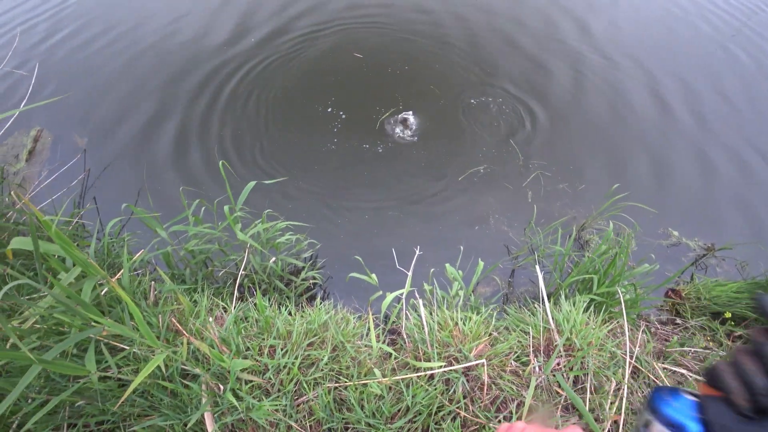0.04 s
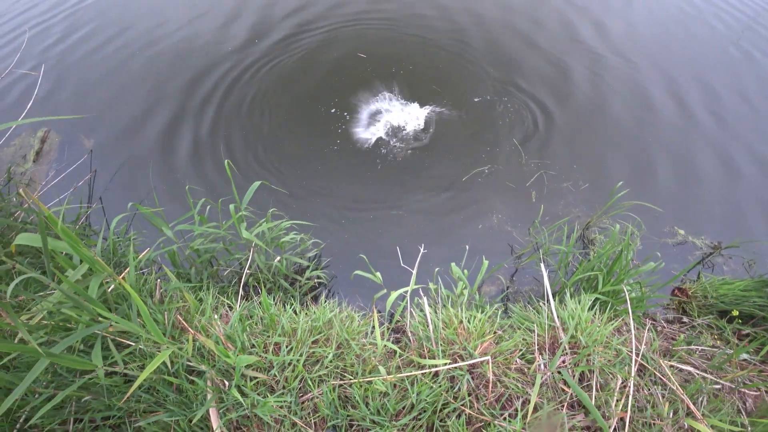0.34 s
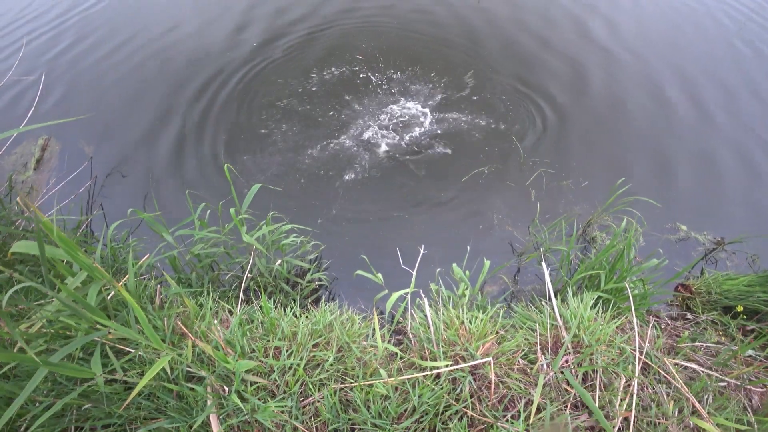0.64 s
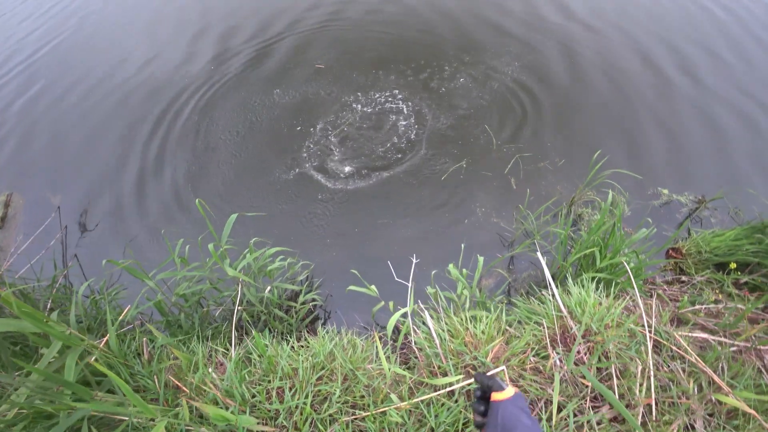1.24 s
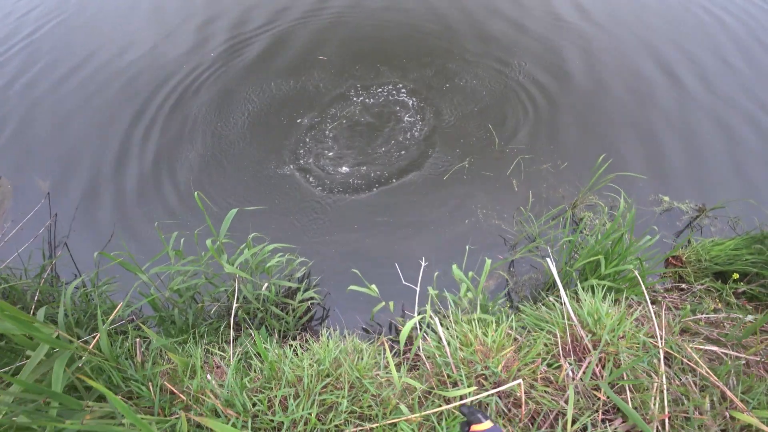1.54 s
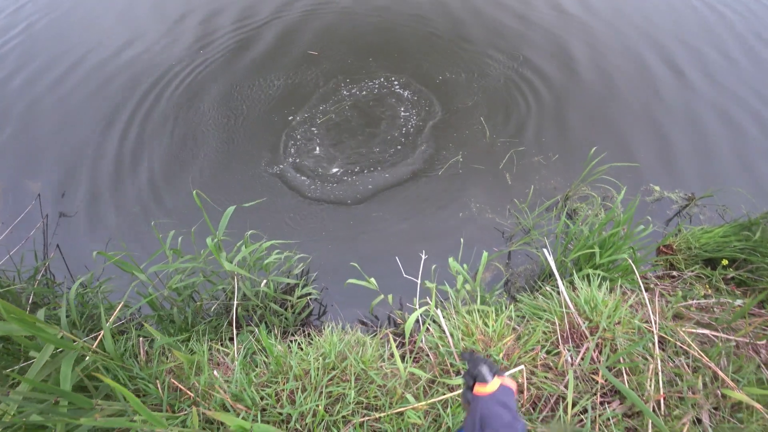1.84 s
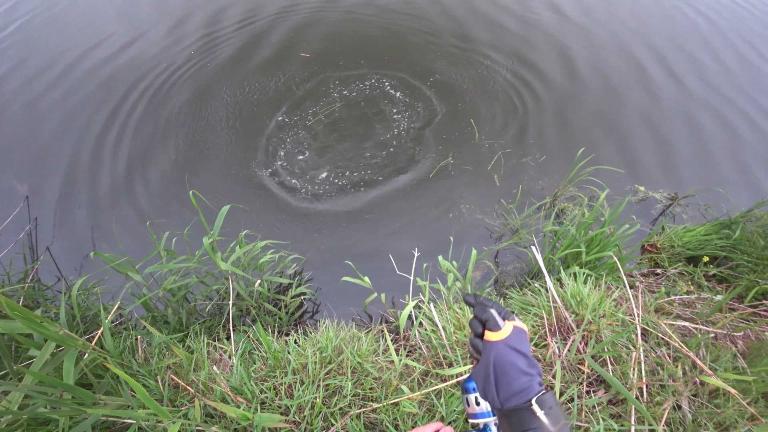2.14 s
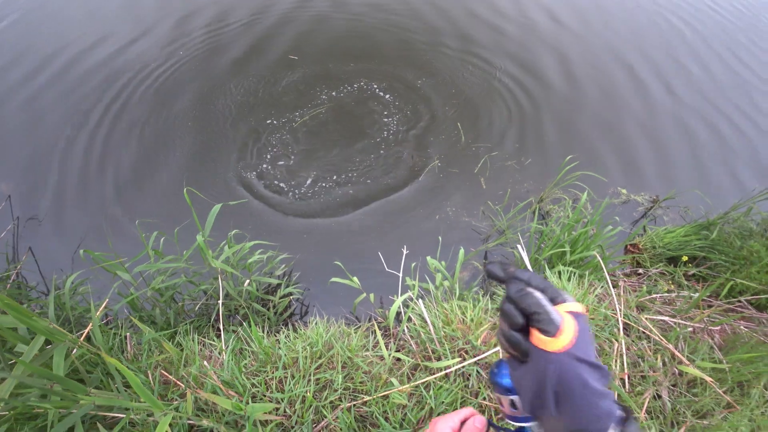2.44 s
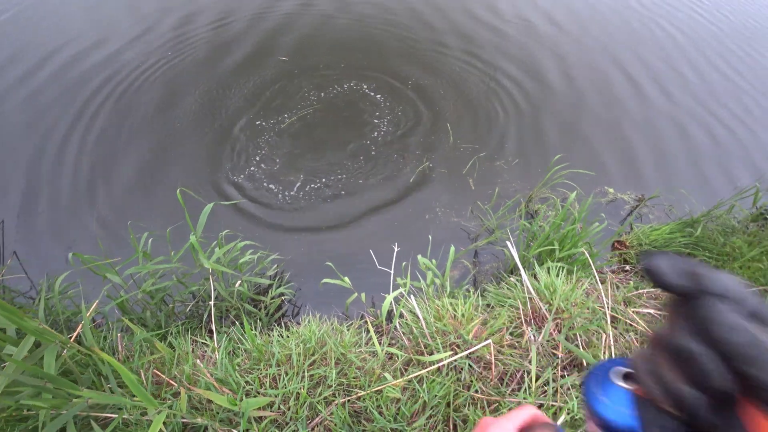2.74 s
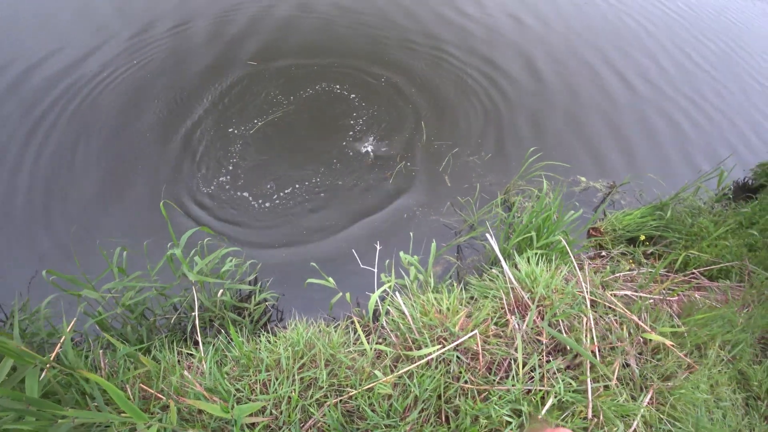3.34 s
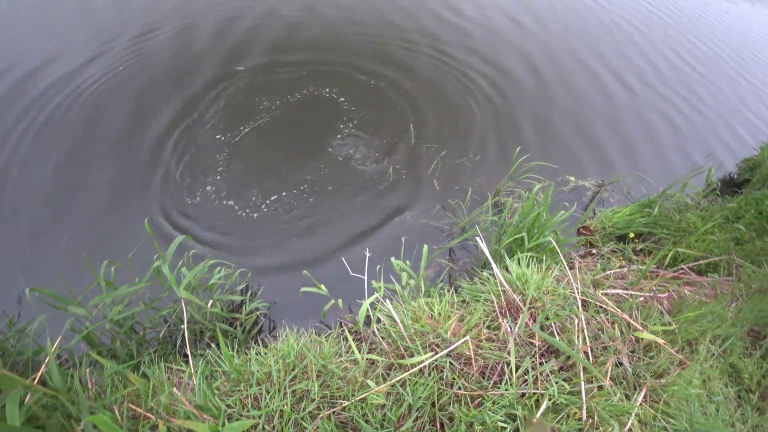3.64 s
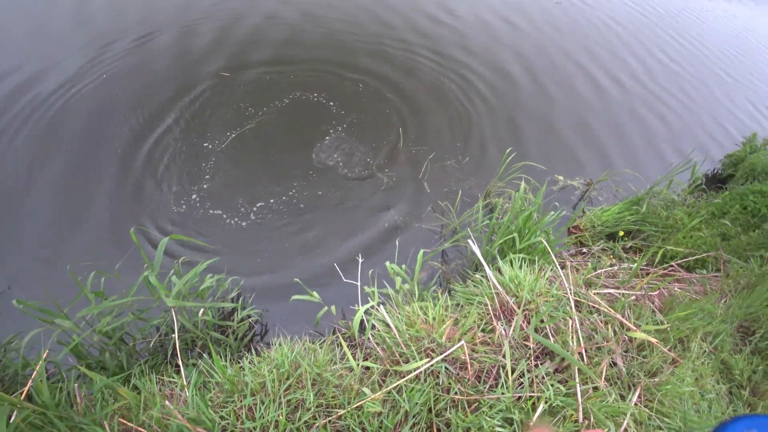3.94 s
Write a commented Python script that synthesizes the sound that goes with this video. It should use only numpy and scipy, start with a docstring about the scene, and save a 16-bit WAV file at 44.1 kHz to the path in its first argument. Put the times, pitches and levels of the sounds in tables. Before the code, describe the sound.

A thrashing splash in a pond, with spray, drips and a faint second splash.

```python
"""A pond, a few metres from a grassy bank, in stereo with the action almost straight ahead.
At once something thrashes at the surface: water slaps, air pockets gulp, then spray rains back
and thins to stray drips. The grass rustles faintly, and three seconds on a weak second splash
bubbles up. Behind it all lie a soft far-off wind and the thin, high chirps of an insect."""
import sys
import numpy as np
from scipy import signal
from scipy.io import wavfile
from scipy.ndimage import uniform_filter1d

SR = 44100
rng = np.random.default_rng(int(sys.argv[2]) if len(sys.argv) > 2 else 0)


def int16_out(signal):
    """Quantize to a 16-bit WAV file."""
    q = np.round(np.clip(np.atleast_2d(signal).T, -1, 1) * 32767)
    wavfile.write(sys.argv[1], SR, q.astype(np.int16))


N = 4 * SR


def slaps(attack_s=0.0014):
    """Sheets of water slap the pond, each a short noise burst of breaking foam."""
    # slaps: t/s, level/dB, decay/s, tilt/(dB per octave)
    hits = [(.169, -28.5, 0.0059, -0.5), (0.241, -21, 0.0049, 1.5), (0.2529, -17.5, 0.0053, 2.5),
            (0.3591, -25, 0.0064, 0), (0.382, -29, 0.0073, 4.5), (0.4257, -21, 0.0047, -1),
            (.434, -28.5, 0.0056, 2.5), (0.444, -29, .004, 3.5), (0.5023, -26.5, 0.0023, 0.5),
            (.516, -32, 0.0055, -2), (.629, -25.5, 0.0087, -4.5), (0.652, -34, 0.0041, 5),
            (.873, -37.5, 0.009, 2), (0.893, -35, 0.0023, 6), (1.167, -41, 0.0046, 5),
            (1.187, -40.5, 0.0035, 5), (1.2383, -40, .002, 1), (1.4584, -37.5, 0.001, -5.5),
            (3.207, -44.5, 0.016, 0), (3.429, -42, 0.01, 0), (3.488, -38.5, 0.0026, -4)]
    # spectrum of a slap: f/Hz, level/dB
    spectrum = [(88, -71), (179, -40), (244, -11.5), (352, -13), (428, -1), (643, -6), (900, -0.5),
                (1450, -8.5), (1830, 7), (2860, 0.5), (3410, -3), (4060, 2), (4930, -5), (5440, -1.5),
                (8830, -17), (15500, -29)]
    out, t = np.zeros(N), np.arange(4096) / SR
    for s, db, decay, tilt in hits:
        shape = envelope(t, attack_s, decay)
        burst = colour(rng.standard_normal(len(t)) * shape, spectrum, tilt)
        add(out, s, amp(db) * burst * np.linalg.norm(shape) / np.linalg.norm(burst))
    return out


def gulps(attack_s=0.0041, partner_ratio=2.2, partner_db=-18, roughness=0.37, wobble_hz=99):
    """Air pockets close under water, each ringing with a second, higher mode; both ring unevenly as they
    deform."""
    # air pockets: t/s, f/Hz, level/dB, decay/s, rise/(octaves per s)
    pockets = [(.129, 1027, -31.5, 0.0046, 6), (.167, 339, -25.5, 0.011, 6.5), (.172, 439, -32.5, 0.018, 6),
               (0.246, 318, -35.5, 0.02, 13), (.327, 414, -32.5, 0.0047, 11), (.424, 486, -29.5, 0.003, 12),
               (.503, 430, -35, 0.0086, 0), (.532, 498, -37.5, .022, -11), (.510, 744, -29, 0.0044, 11),
               (0.539, 272, -45.5, 0.014, 0.5), (0.586, 236, -37, 0.022, -3), (.611, 228, -33, 0.015, 20),
               (.631, 409, -21, 0.0073, 10.5), (.653, 325, -38, .007, -2), (.654, 704, -29.5, .008, 6),
               (3.362, 355, -44.5, 0.036, 30), (3.379, 1184, -44, 0.011, 4),
               (3.399, 1630, -37.5, 0.0112, 8), (3.418, 1800, -42, 0.0042, -1),
               (3.457, 420, -46, 0.0043, 9)]
    out = np.zeros(N)
    for s, hz, db, decay, rise in pockets:
        pocket = bubble(hz, decay, rise, attack_s)
        partner = amp(partner_db) * bubble(hz * partner_ratio, decay, rise, attack_s)
        for ring in pocket, partner:
            add(out, s, amp(db) * ring * (1 + roughness * wobble(len(ring), wobble_hz)))
    return out


def drips():
    """Single drops trap a small bubble and plink; spatter lands with a sharp tick."""
    # drops: t/s, f/Hz, level/dB
    plinks = [(.017, 2700, -32), (0.118, 4350, -30), (0.875, 3280, -27.5), (1.314, 4270, -37.5),
              (1.652, 2300, -26.5), (3.254, 2640, -38.5), (3.342, 9300, -41), (3.542, 3900, -30.5),
              (3.551, 1890, -32), (3.631, 2740, -38.5)]
    # spatter: t/s, f/Hz, level/dB
    ticks = [(.761, 6940, -20.5), (.974, 4930, -22.5), (1.022, 8400, -33), (1.132, 3440, -37),
             (1.16, 6140, -25.5), (1.46, 1150, -28), (1.6515, 3940, -29.5), (1.722, 4500, -37),
             (1.727, 4300, -38), (1.742, 4300, -37), (1.893, 3800, -33), (2.095, 3680, -35),
             (2.095, 7950, -41), (3.3, 5400, -36.5), (3.465, 6960, -34), (3.516, 7200, -38.5),
             (3.599, 5500, -34.5)]
    out = np.zeros(N)
    for s, hz, db in plinks:
        add(out, s, amp(db) * bubble(hz, decay_s=2.9 / hz, rise=35, attack_s=0.00018))
    for s, hz, db in ticks:
        add(out, s, amp(db) * bubble(hz, decay_s=0.00031, rise=0, attack_s=0.5 / hz))
    return out


def spray():
    """Fine spray rains back on the pond after each splash."""
    # spray of the first and of the second splash: t/s, level/dB
    first = [(0, -55), (.11, -52), (.16, -36), (.22, -42.5), (.27, -39), (.35, -36.5), (.405, -39),
             (.44, -37), (.50, -35.5), (.60, -38.5), (.66, -37), (.75, -42), (.84, -45.5), (1.15, -52.5),
             (1.4, -63)]
    second = [(3.15, -86), (3.37, -64), (3.44, -60), (3.7, -85)]
    # spectrum of the spray: f/Hz, level/dB
    spectrum = [(200, -3), (600, -13), (1100, -5), (1450, -5.5), (1850, 1.5), (2850, 1), (3350, -3.5),
                (4050, 1.5), (4900, -3.5), (7500, -7.5), (9000, -14), (12000, -18), (15500, -23.5)]
    drops = shower(spectrum, per_s=7000, spread_db=-0.5, band_hz=(694, 14350), cycles=1.97, width=0.099)
    return drops * (level(first) + level(second))


def patter():
    """Separate drops land after each splash, spread wider across the stereo image."""
    # fall of drops: t/s, level/dB
    fall = [(.1, -74), (.3, -53), (.9, -50.5), (1.18, -52.5), (1.3, -68), (3.15, -90), (3.3, -59.5),
            (3.5, -64), (3.8, -88)]
    # spectrum of the drops: f/Hz, level/dB
    spectrum = [(500, -33), (1900, -12), (4200, 3.5), (11000, -9), (15500, -27)]
    drops = shower(spectrum, per_s=380, spread_db=2, band_hz=(1860, 12400), cycles=1.23, width=0.64)
    return drops * level(fall)


def churn():
    """The broken surface churns with low bubbles, then settles to a quiet burble."""
    # churning: t/s, level/dB
    surge = [(0, -47.5), (.1, -50.5), (.17, -40.5), (.22, -43), (.31, -37.5), (.4, -47), (.52, -42),
             (.6, -44.5), (.65, -39.5), (.72, -48), (.85, -55), (1.1, -55.5)]
    # spectrum of the churning: f/Hz, level/dB
    spectrum = [(100, -48), (190, -13.5), (280, -11.5), (450, -3), (600, -3.5), (780, -4), (1150, 1.5),
                (1450, -12), (2500, -47.5), (8000, -74.5)]
    bubbles = shower(spectrum, per_s=900, spread_db=3.24, band_hz=(218, 1602), cycles=1.88, width=0.59)
    return bubbles * level(surge)


def fizz():
    """Small bubbles plink as air wells up around both splashes."""
    # rising air: t/s, level/dB
    welling = [(0, -51), (.7, -49), (1.5, -75.5), (3.1, -79), (3.22, -57.5), (3.48, -51.5), (3.6, -55),
               (3.8, -72)]
    # spectrum of the fizz: f/Hz, level/dB
    spectrum = [(1800, 3.5), (4200, -3.5), (10000, -21)]
    bubbles = shower(spectrum, per_s=560, spread_db=2, band_hz=(1602, 10400), cycles=6, width=0.38)
    return bubbles * level(welling)


def bank(pair, echo_db=-11, t60_s=0.058, delay_s=0.004):
    """Adds faint scatter from the bank and reeds, different at each microphone."""
    t = np.arange(SR // 3) / SR
    tail = rng.standard_normal((2, len(t))) * amp(-60 * t / t60_s) * (t > delay_s)
    echo = signal.fftconvolve(pair, tail / np.linalg.norm(tail[0]), axes=1)[:, :N]
    return pair + amp(echo_db) * echo


def wind(patchy_db=1.0):
    """Far-off wind: a soft rush with drifting patches, partly alike at the two microphones."""
    # spectrum of the wind: f/Hz, level/dB
    spectrum = [(25, -55), (75, -21), (152, -24), (300, -25.5), (400, -19), (598, -7.5), (826, -1.5),
                (1140, -3), (1900, -11.5), (3930, -26), (6730, -35), (7700, -35.5), (9050, -37),
                (15500, -34.5)]
    # strength of the wind: t/s, level/dB
    strength = [(0, -44.5), (1.3, -47), (2.2, -46.5), (3.6, -46.5), (4, -48)]
    # likeness of left and right: f/Hz, coherence/1
    coherence = [(100, 0.98), (380, 0.72), (950, 0.56), (2380, 0.066), (15000, 0.17)]
    # stereo balance: f/Hz, left minus right/dB
    balance = [(150, 0.5), (950, 5.5), (2380, 4.5), (5980, -2), (15000, 0.5)]
    hz = np.fft.rfftfreq(2048, 1 / SR)
    noise = rng.standard_normal((N // 512 + 5, len(hz), 5)).T
    left, unrelated = noise[0] + 1j * noise[1], noise[2] + 1j * noise[3]
    same = read(coherence, hz)[:, None]
    right = same * left + np.sqrt(1 - same ** 2) * unrelated
    patches = uniform_filter1d(noise[4], size=20, axis=0)  # smooth across frequency
    patches = unit(uniform_filter1d(patches, size=9, axis=1))  # and across time
    gain = amp(read(spectrum, hz)[:, None] + patchy_db * patches)
    sides = amp(np.outer([.5, -.5], read(balance, hz)))[:, :, None]
    _, rush = signal.istft(np.array([left, right]) * gain * sides, nperseg=2048, noverlap=1536)
    return level(strength) * unit(rush[:, :N])


def rustle():
    """Grass on the bank gives a faint, dry crackle."""
    # two stirs of the grass: t/s, level/dB
    stirs = [(2.1, -80), (2.42, -60.5), (2.8, -80), (3.15, -60.5), (3.8, -77)]
    # spectrum of the grass: f/Hz, level/dB
    spectrum = [(1500, -34), (3000, 6), (4100, 6.5), (5500, -5.5), (8000, -30)]
    crackle = shower(spectrum, per_s=2000, spread_db=2.4, band_hz=(2200, 10700),
                     cycles=3.4, width=0.87, pitches=16)
    return crackle * level(stirs)


def swishes(flutter_hz=520):
    """Brief, faint swishes, each a narrow hiss that swells and fades."""
    # swishes: t/s, length/s, f/Hz, level/dB
    hisses = [(1.738, .035, 4740, -56.5), (2.052, .025, 5350, -60), (2.863, .05, 5020, -57.5)]
    out = np.zeros(N)
    for s, length, hz, db in hisses:
        t = np.arange(0, length, 1 / SR)
        hiss = wobble(len(t), flutter_hz) * np.sin(2 * np.pi * hz * t)
        add(out, s, amp(db) * np.sin(np.pi * t / length) * hiss)
    return out


def insect(pitch_hz=11260, waver_hz=65, level_db=-71.5, chirp_s=0.098, edge_s=0.013):
    """An insect gives short, even chirps on one very high, slightly wavering note."""
    # chirp starts: t/s
    starts = [0, 1.397, 1.83, 2.262, 2.797, 3.226, 3.768]
    out, t = np.zeros(N), np.arange(0, chirp_s, 1 / SR)
    gate = np.clip(np.minimum(t, chirp_s - t) / edge_s, 0, 1)
    for s in starts:
        hz = pitch_hz + waver_hz * wobble(len(t), 200)
        add(out, s, amp(level_db) * gate * np.sin(2 * np.pi * np.cumsum(hz) / SR))
    return out


def bubble(hz, decay_s, rise, attack_s):
    """A dying sine gliding by `rise` octaves per s; a bubble's pitch climbs as it nears the surface."""
    t = np.arange(0, 7 * decay_s + attack_s, 1 / SR)
    pitch = np.minimum(hz * 2 ** (rise * t), SR / 2)
    return envelope(t, attack_s, decay_s) * np.sin(2 * np.pi * np.cumsum(pitch) / SR)


def shower(spectrum, per_s, spread_db, band_hz, cycles, width, pitches=40):
    """A steady stereo rain of tiny random pings at rms 1, each decaying over `cycles` periods."""
    out = np.zeros((2, N))
    per_pitch = int(per_s * N / SR / pitches)
    for hz in np.geomspace(*band_hz, pitches):
        when, chance, pan = rng.random((N // 100, 3))[:per_pitch].T
        size = amp(spread_db * np.minimum(-np.log(chance + 1e-9), 4))
        clicks = np.zeros((2, N))
        clicks[:, (when * N).astype(int)] = size * (1 + width * np.outer([1, -1], 2 * pan - 1))
        decay_s = cycles / hz
        ping = bubble(hz, decay_s, rise=0.021 / decay_s, attack_s=0.51 * decay_s)
        ping *= np.sqrt(hz / np.sum(ping ** 2))  # equal energy per Hz across the band
        out += signal.oaconvolve(clicks, ping[None], axes=1)[:, :N]
    return unit(np.array([colour(side, spectrum) for side in out]))


def colour(x, spectrum, tilt_db=0):
    """Minimum-phase filter with the given spectrum, tilted by tilt_db per octave above 500 Hz."""
    hz = abs(np.fft.fftfreq(4096, 1 / SR))
    db = read(spectrum, hz) + tilt_db * np.log2(np.maximum(hz, 500) / 2000)
    log_gain = np.log(amp(np.maximum(db, -90)))
    response = np.exp(np.conj(signal.hilbert(log_gain)))
    taps = np.fft.ifft(response).real[:2048]
    return signal.fftconvolve(x, taps)[:len(x)]


def envelope(t, attack_s, decay_s):
    """A linear rise, then an exponential decay."""
    return np.minimum(t / attack_s, 1) * np.exp(-np.maximum(t - attack_s, 0) / decay_s)


def wobble(count, hz):
    """A random flutter of rms about 1, low-passed at hz."""
    low_pass = signal.butter(2, hz, fs=SR, output="sos")
    return unit(signal.sosfilt(low_pass, rng.standard_normal(SR)))[-count:]


def amp(db):
    """Decibels to gain."""
    return 10 ** (np.asarray(db) / 20)


def unit(x):
    """Scales to rms 1."""
    return x / np.sqrt(np.mean(x ** 2) + 1e-20)


def read(points, hz):
    """Interpolates a table on a log-frequency axis."""
    f, value = np.transpose(points)
    return np.interp(np.log(hz + 1), np.log(f + 1), value)


def level(points):
    """A level curve as gain per sample."""
    return amp(np.interp(np.arange(N) / SR, *np.transpose(points)))


def add(mix, s, sound):
    """Lays a sound into the mix at time s."""
    part = mix[round(s * SR):][:len(sound)]
    part += sound[:len(part)]


def scene(lean_right_db=0.34, low_cut_hz=200):
    """The splashes sit almost straight ahead, with no deep bass; wind, grass and insect lie behind."""
    water = slaps() + gulps() + drips() + spray() + patter() + churn() + fizz()
    water *= amp([[-lean_right_db], [lean_right_db]])
    water = signal.sosfilt(signal.butter(4, low_cut_hz, "high", fs=SR, output="sos"), water)
    return bank(water) + wind() + rustle() + swishes() + insect()


def record(dry, edge_hz=15800):
    """The recorder's band limit cuts the highest treble."""
    low_pass = signal.firwin(511, edge_hz, window=("kaiser", 9), fs=SR)
    return signal.oaconvolve(dry, low_pass[None], "same")


dry = scene()
out = record(dry)
int16_out(out)
```